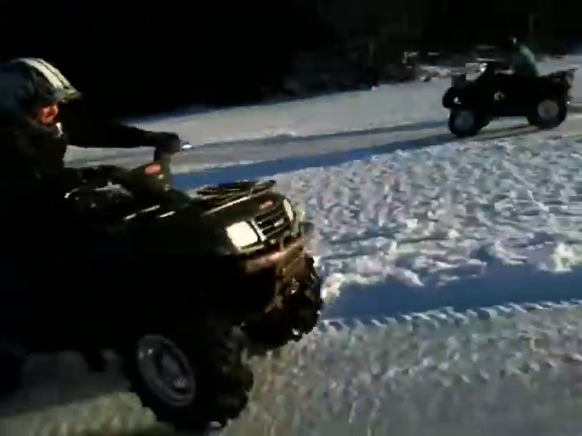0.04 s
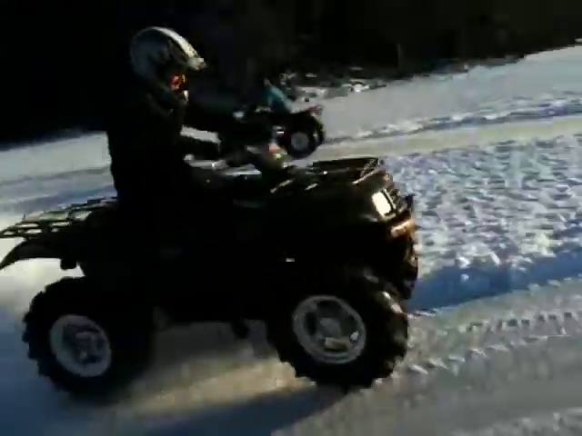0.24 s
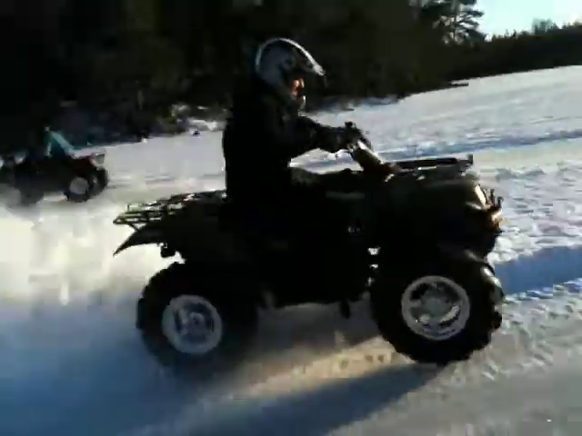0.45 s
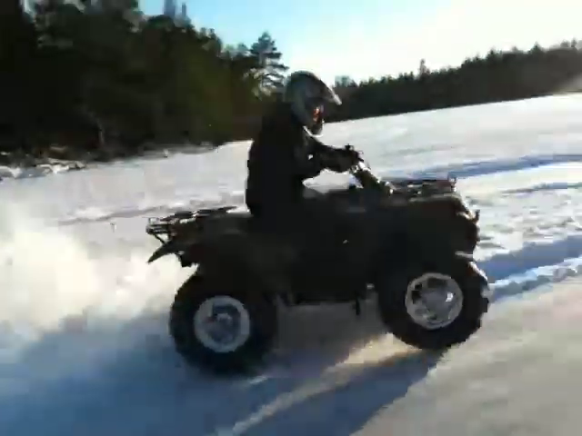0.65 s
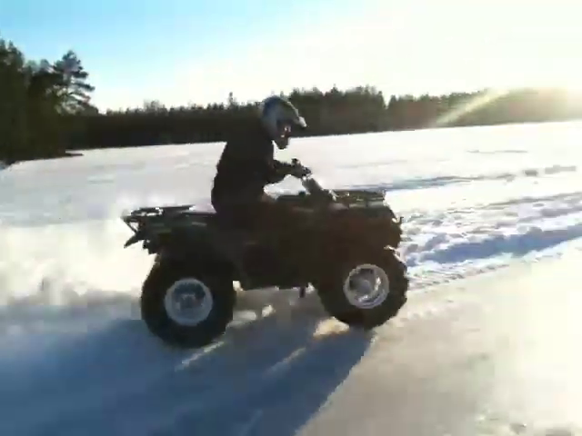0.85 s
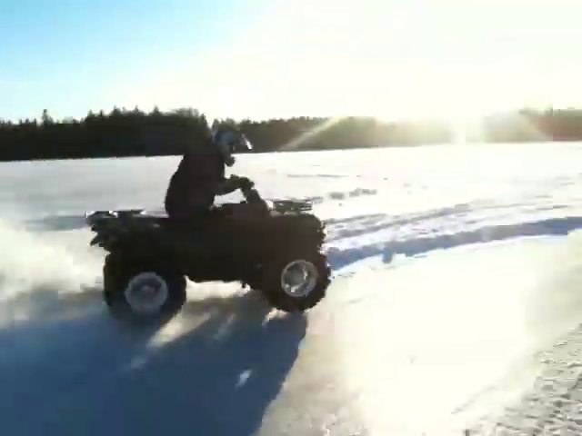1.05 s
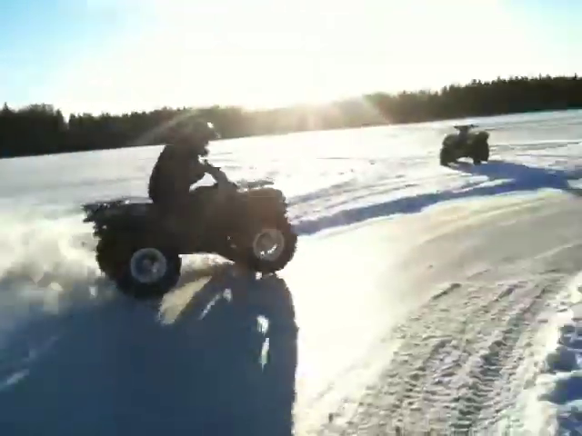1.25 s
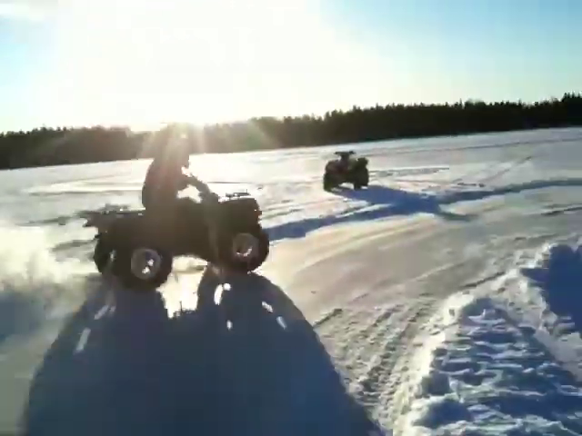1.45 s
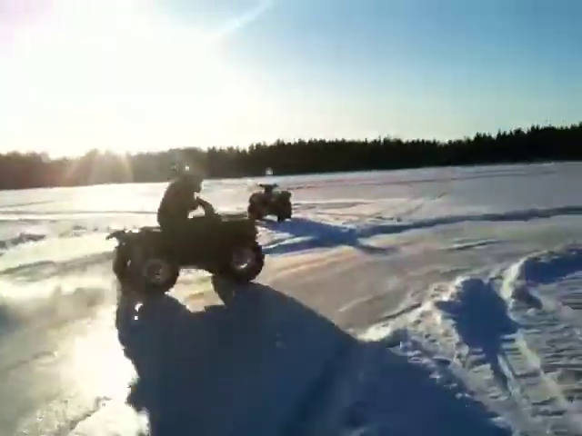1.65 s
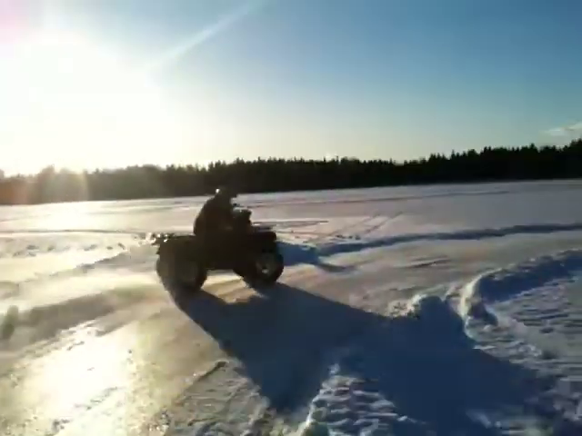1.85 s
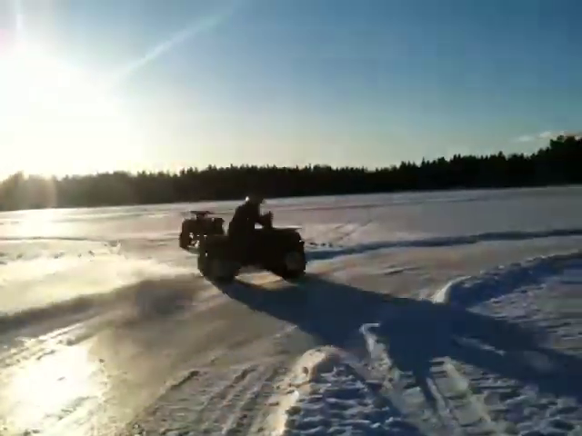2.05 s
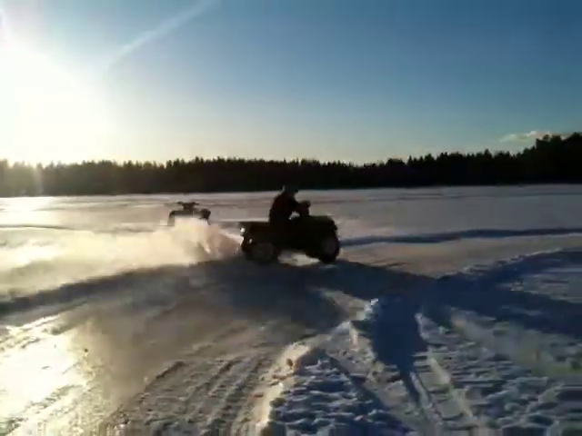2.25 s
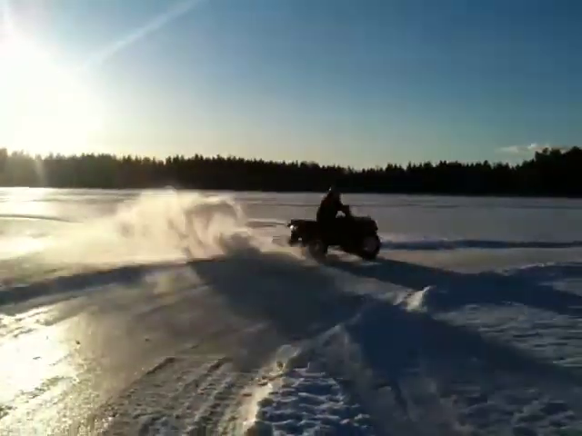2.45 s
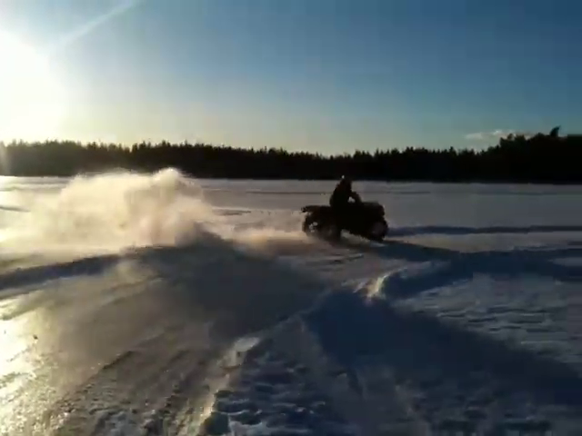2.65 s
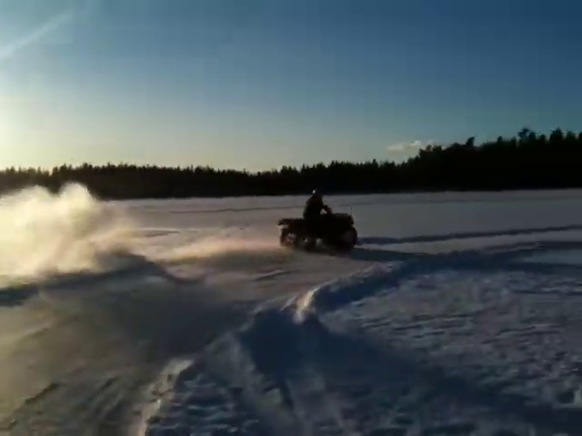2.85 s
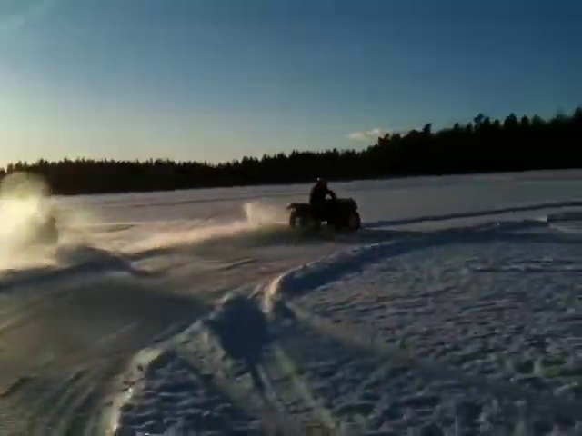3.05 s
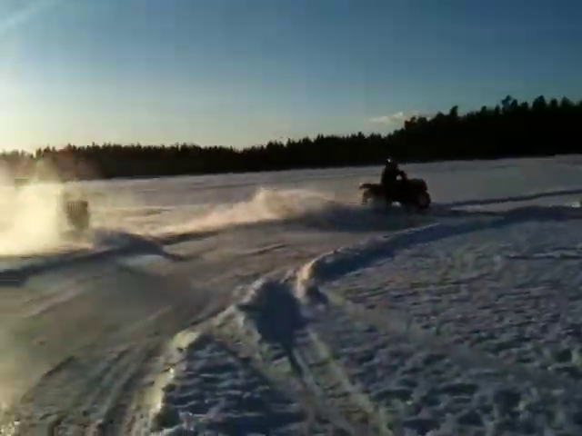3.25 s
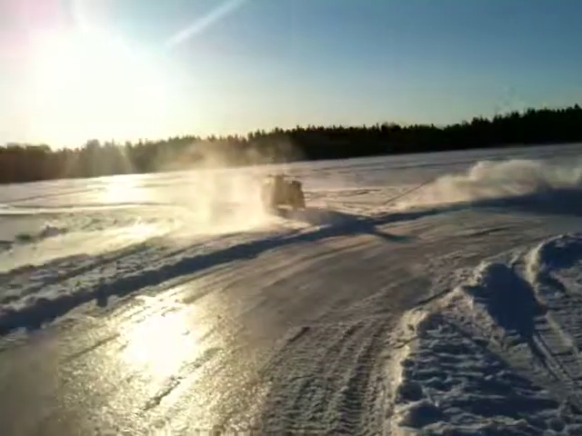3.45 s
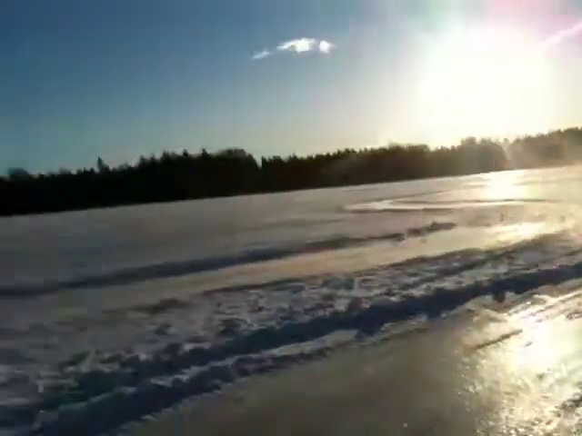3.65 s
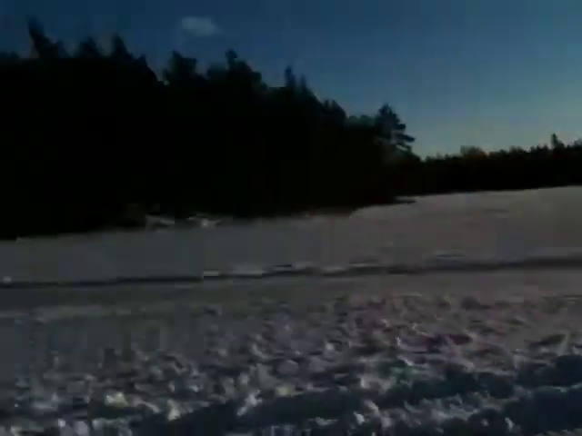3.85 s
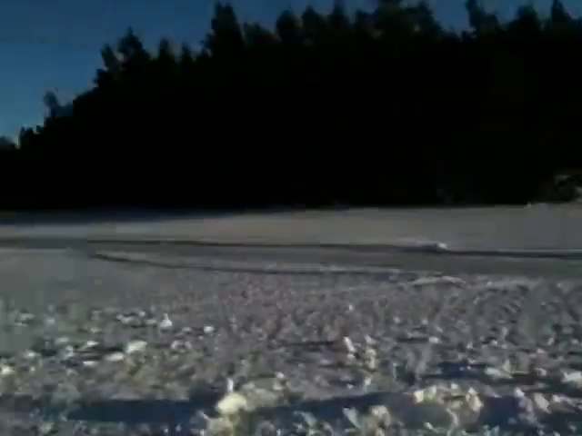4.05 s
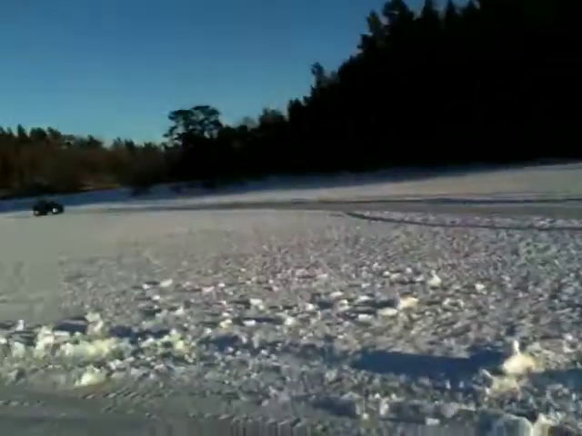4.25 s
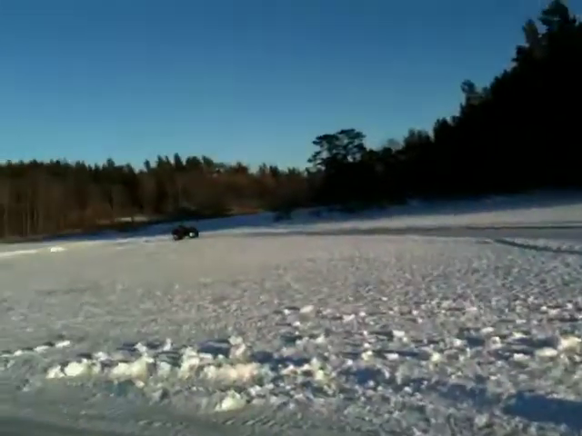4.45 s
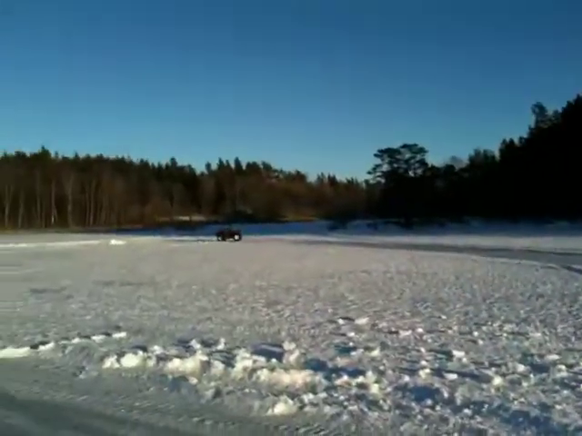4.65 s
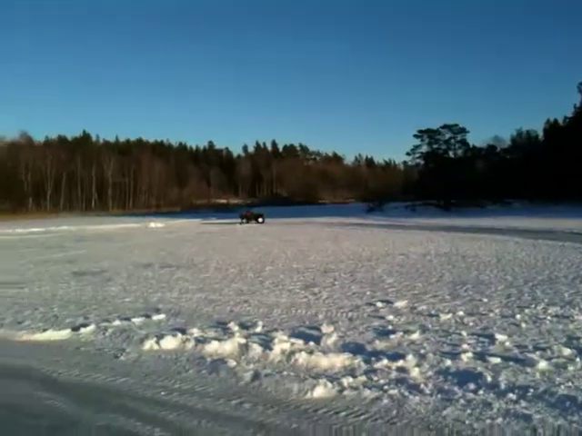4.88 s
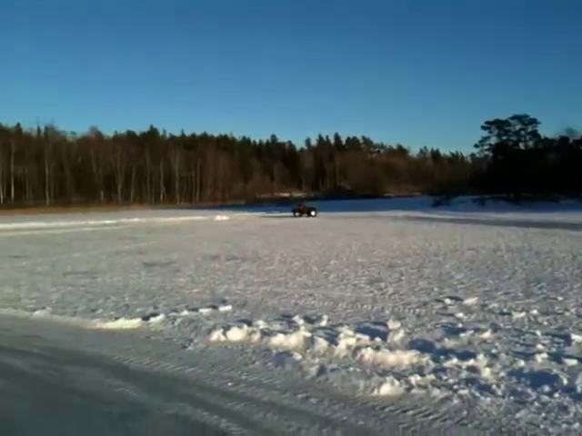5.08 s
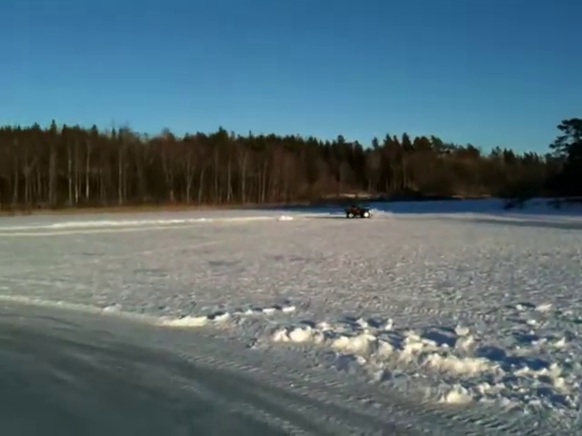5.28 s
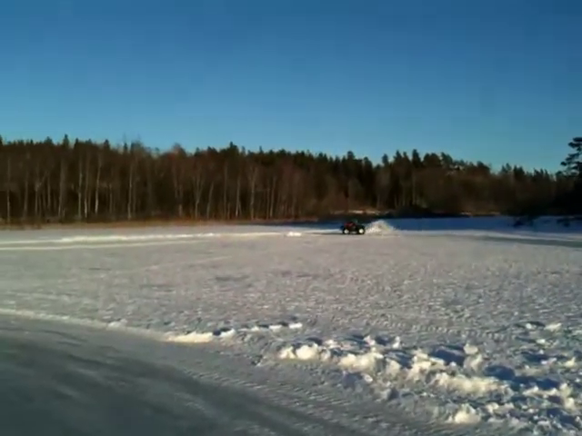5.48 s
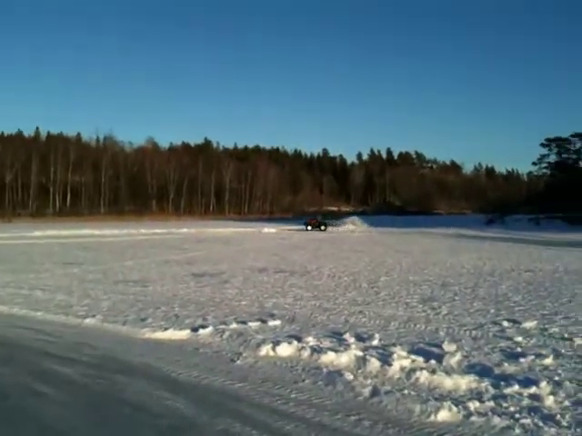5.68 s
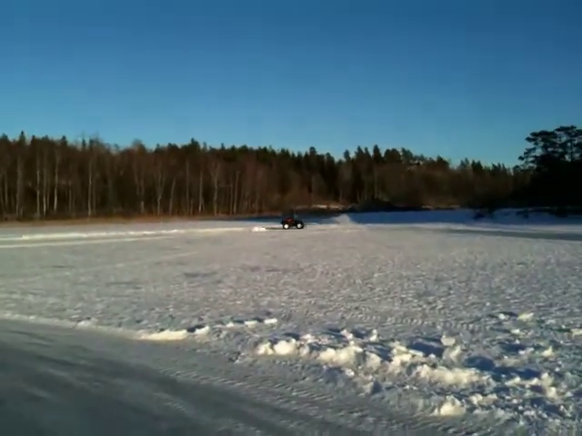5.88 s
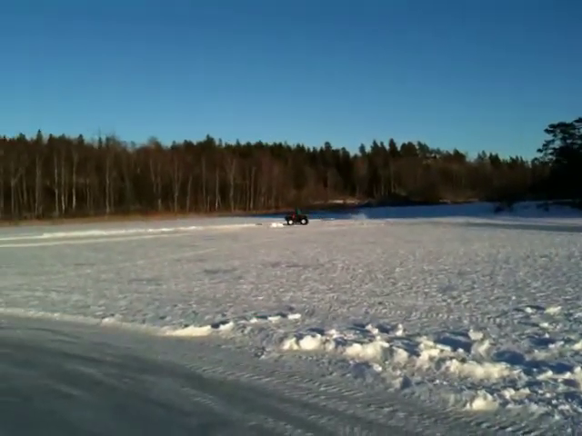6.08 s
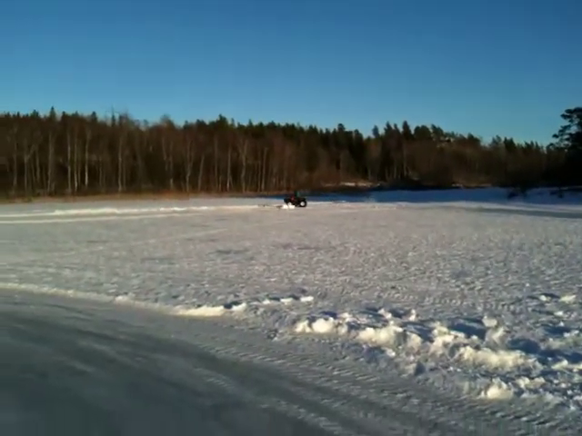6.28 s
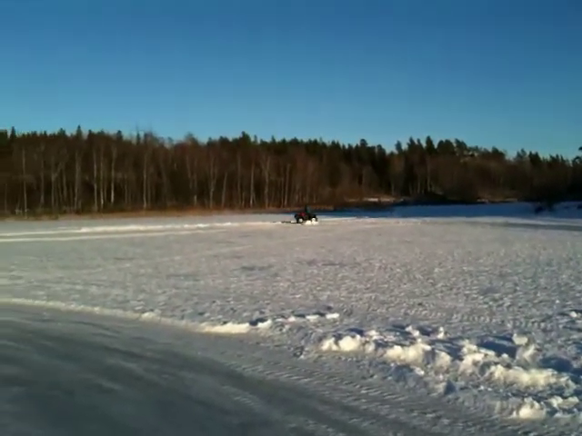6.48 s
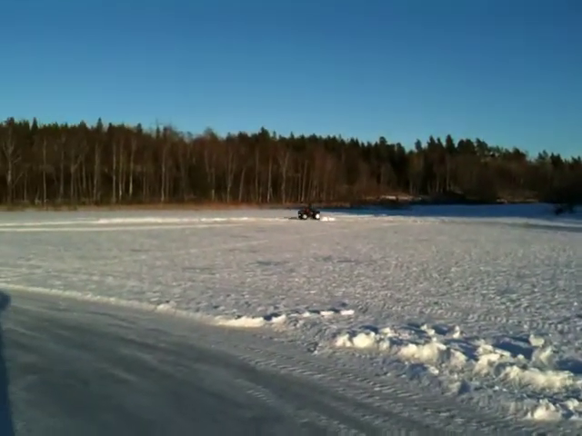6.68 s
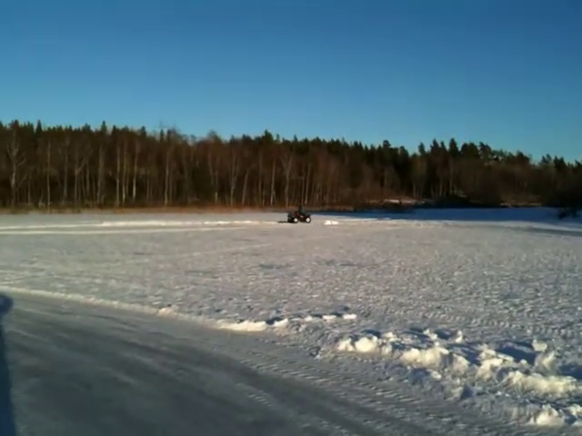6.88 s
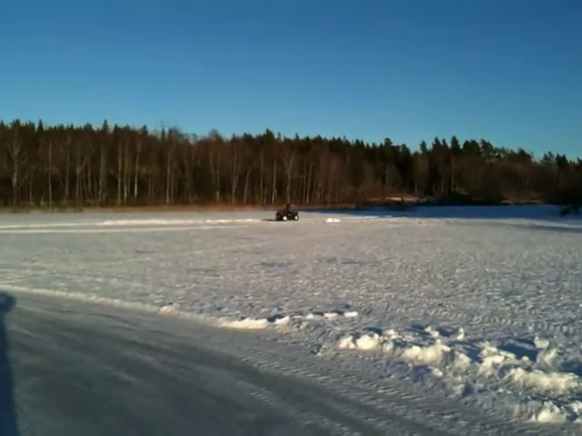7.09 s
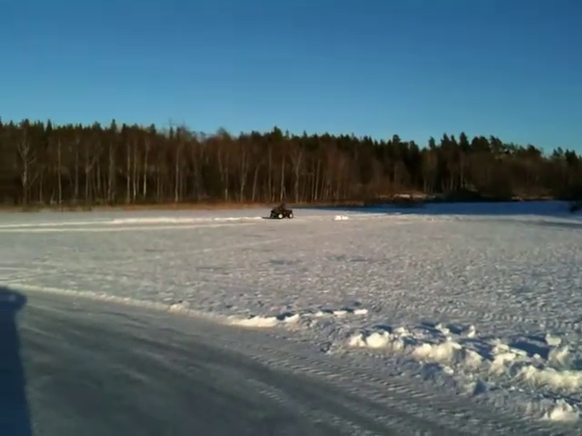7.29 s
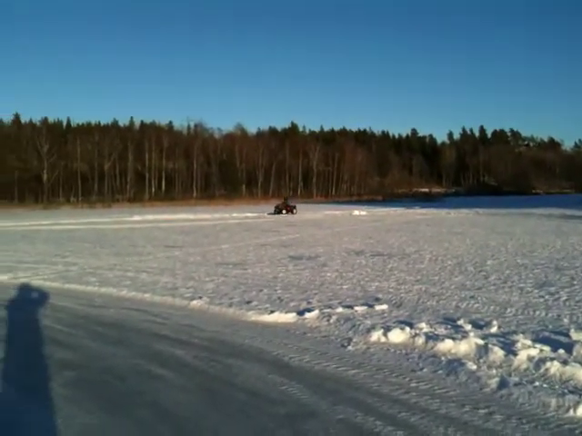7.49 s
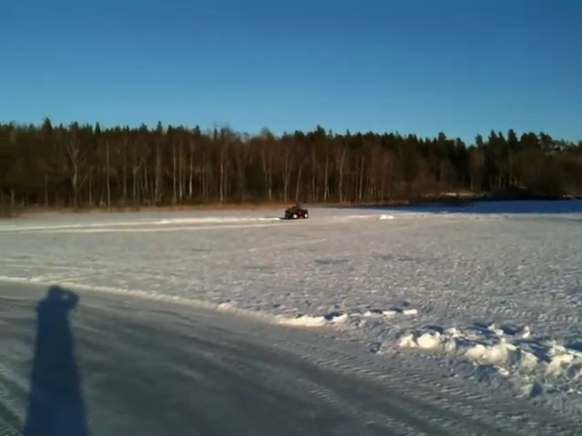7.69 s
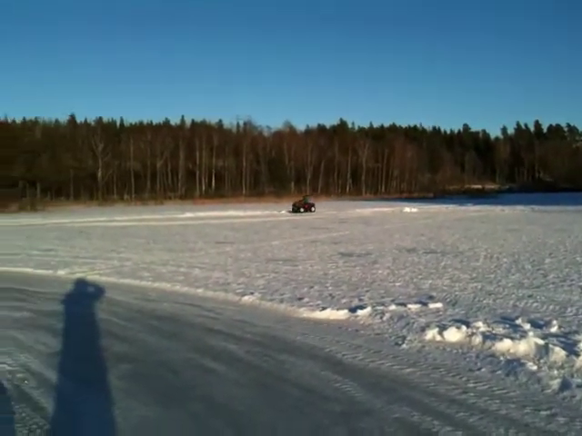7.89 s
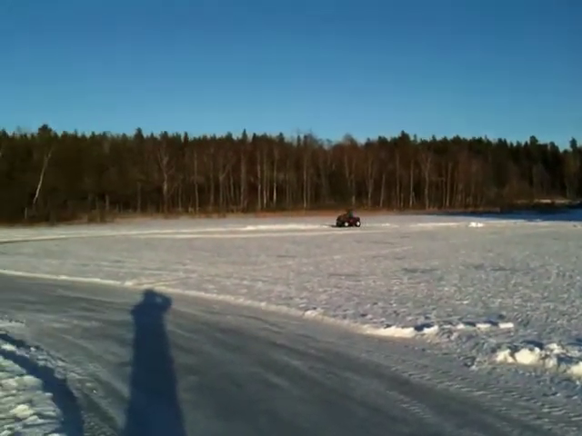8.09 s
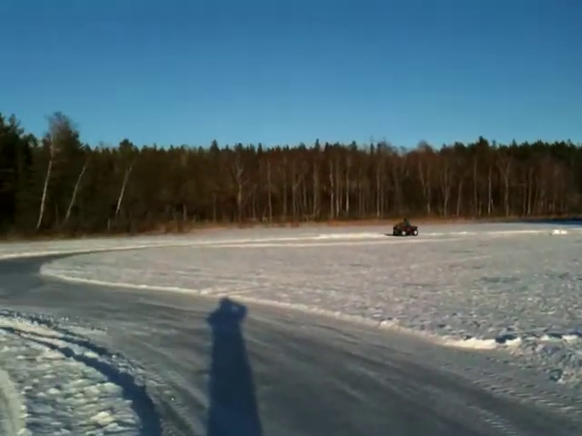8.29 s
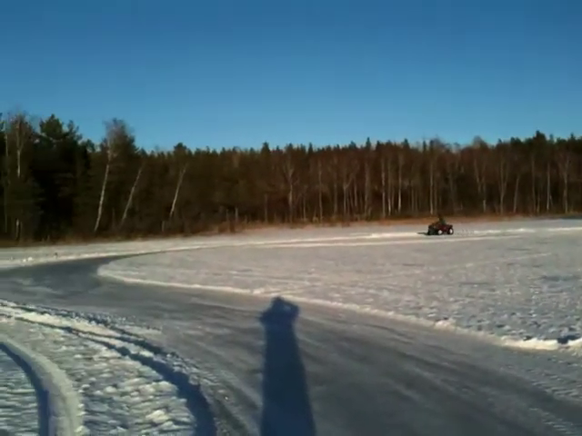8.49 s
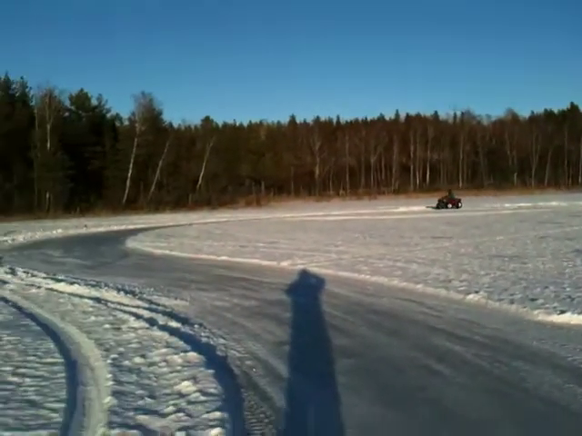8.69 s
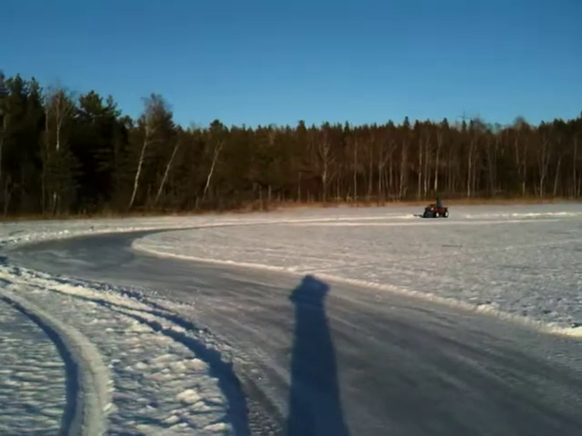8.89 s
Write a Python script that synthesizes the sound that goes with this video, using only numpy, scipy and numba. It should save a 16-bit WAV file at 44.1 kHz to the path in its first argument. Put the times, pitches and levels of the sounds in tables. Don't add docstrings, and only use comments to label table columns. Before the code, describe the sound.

A quad bike skids past close at full throttle, a hoarse, barking, steady engine roar with belt whine, singing metal and gritty tyre hiss. Just before two seconds its pitch sags, then climbs again as it drives off, duller and quieter. Wind thumps the handheld phone, and distant engines hum and chug faintly across the open frozen lake with a little snow crunch.

```python
import sys
import numpy as np
from scipy import signal
from scipy.fft import rfft, irfft
from scipy.io import wavfile
from scipy.ndimage import uniform_filter1d
from numba import njit

SR = 44100
rng = np.random.default_rng(int(sys.argv[2]) if len(sys.argv) > 2 else 0)


def store_wav(level_fs):
    pcm = np.round(np.clip(np.atleast_2d(level_fs), -1, 1) * 32767)
    wavfile.write(sys.argv[1], SR, pcm.T.astype(np.int16))


def boost(x):
    u = np.asarray(x, float) / 20
    return 10 ** u


N = 393813


def unit(x):
    return x / np.sqrt(np.mean(x ** 2))


def curves(table):
    s, *columns = np.transpose(table)
    t = np.arange(N) / SR
    fade_in = np.clip((t - s[0]) / .03 + (s[0] == 0), 0, 1)
    fade_out = np.clip((s[-1] + .02 - t) / .03, 0, 1)
    return [np.interp(t, s, column) for column in columns] + [fade_in * fade_out]


def colour(x, table):
    hz, db = np.transpose(table)
    grid = np.maximum(np.arange(4097) * SR / 8192, 1)
    log_gain = np.interp(np.log(grid), np.log(hz), np.maximum(db, -70)) * np.log(10) / 20
    cepstrum = irfft(log_gain)
    cepstrum[1:4096] *= 2
    cepstrum[4097:] = 0
    response = irfft(np.exp(rfft(cepstrum)))[:4096]
    return unit(signal.oaconvolve(x, response)[:N])


def walk(rate):
    k = int(SR / rate)
    steps = np.repeat(rng.standard_normal(N // k + 1), k)
    return unit(uniform_filter1d(uniform_filter1d(steps, k), k)[:N])


def clicks(at, size):
    at = np.clip(at, 0, N - 2)
    i = at.astype(int)
    return np.bincount(i, size * (1 + i - at), N) + np.bincount(i + 1, size * (at - i), N)


def mix(locked, loose, share):
    share = np.clip(share, 0, 1)
    return np.sqrt(share) * locked + np.sqrt(1 - share) * loose


def swell(start_s, hold_s, attack_s, release_s):
    t = np.arange(N) / SR - start_s
    rise = np.clip(t / attack_s + (start_s <= 0), 0, 1)
    return rise * np.exp(-np.maximum(t - hold_s, 0) / release_s)


def glide_swell(start_s, hold_s):
    return swell(start_s, hold_s, attack_s=0.02, release_s=0.035)


def glide(start_s, hold_s, first_hz, last_hz, db):
    hz = np.interp(np.arange(N) / SR, [start_s, start_s + hold_s], [first_hz, last_hz])
    return hz, boost(db) * glide_swell(start_s, hold_s)


@njit
def ring(x, hz, width_hz):
    y, band, low = np.empty(len(x)), 0., 0.
    for i in range(len(x)):
        g, k = np.tan(np.pi * hz[i] / SR), width_hz / hz[i]
        v = (band + g * (x[i] - low)) / (1 + g * (g + k))
        band, low, y[i] = 2 * v - band, low + 2 * g * v, k * v
    return y


def ring_twice(x, hz, width_hz):
    return unit(ring(ring(x, hz, width_hz), hz, width_hz))


def bands(x, table, width_hz):
    total = np.zeros(N)
    for row in table:
        hz, gain = glide(*row)
        total += gain * ring_twice(x, hz, width_hz)
    return total


def firings(hz, jitter, scatter_db, second_db, puff_s):
    phase = np.cumsum(hz) / SR
    cycles = np.arange(int(phase[-1]))
    chance = rng.standard_normal((600, 4))[:len(cycles)].T
    first = np.interp(cycles + jitter * chance[0], phase, np.arange(N))
    second = np.interp(cycles + .301 + jitter * chance[1], phase, np.arange(N))
    pulses = clicks(first, boost(scatter_db * chance[2]))
    pulses = pulses + clicks(second, boost(second_db + scatter_db * chance[3]))
    keep = np.exp(-1 / (puff_s * SR))
    rounded = signal.lfilter([1], [1, -keep ** 8], pulses)
    return pulses, unit(signal.lfilter([1], [1, -keep], rounded))


# f/Hz, level/dB
AIR_TONE = [(20, -18), (60, 4), (150, 8.5), (330, -25), (500, -11.5), (1500, -14), (2800, -21.5),
            (5700, -25), (15000, -42.5)]


def still_air():
    return boost(-47 + 0.6 * walk(3.87)) * colour(rng.standard_normal(N), AIR_TONE)


# t/s, hold/s, multiple, level/dB
CLEAR_LINES = [(0, .72, 16, -29), (.15, .55, 13, -29), (.2, 1.1, 19, -33), (.66, .6, 17, -33),
               (1.15, .55, 23, -36), (1.3, .42, 26, -36), (1.4, .42, 7, -31), (1.6, .22, 8, -33),
               (1.82, .26, 4, -26), (2.1, .14, 5, -33), (2.1, .2, 6, -33), (2.12, .9, 7, -38),
               (2.15, .45, 10, -39), (2.1, .16, 15, -38), (2.32, .6, 12, -39), (2.3, .9, 13, -41),
               (2.55, 1.2, 20, -43), (3.2, .7, 19, -45), (3.3, .4, 26, -45)]


def clear_lines(exhaust, hz):
    total = np.zeros(N)
    for s, hold, multiple, db in CLEAR_LINES:
        total += boost(db) * glide_swell(s, hold) * ring_twice(exhaust, multiple * hz, 30.)
    return total


# t/s, hold/s, first f/Hz, last f/Hz, level/dB
PIPE_RINGS = [(0, 0.53, 727, 720, -24), (0, 0.22, 290, 230, -23), (0, 0.59, 870, 847, -34),
              (0.38, 0.49, 820, 870, -30), (0.6, 0.61, 990, 975, -28.5), (1.47, 0.31, 1190, 1310, -27.5),
              (0.3, 0.34, 994, 1060, -38), (1.14, 0.44, 400, 400, -29), (0, 0.24, 530, 720, -33),
              (1.3, 0.033, 560, 560, -30), (2.5, 0.99, 410, 430, -36), (4.5, 0.41, 850, 690, -48),
              (1.48, 0.29, 1500, 1600, -31), (0, 0.75, 2700, 2500, -28), (2.5, 1.14, 1800, 2900, -43),
              (3.5, 0.5, 830, 1050, -50), (3.5, 0.32, 1480, 1460, -43.5), (-0.44, 0.27, 970, 980, -20),
              (0.85, .95, 636, 570, -27.5), (1.17, 0.28, 353, 414, -23), (3, 0.27, 1020, 1200, -37)]


def tailpipe(pulses):
    return bands(pulses, PIPE_RINGS, width_hz=135.0) * boost(1.8 * walk(17))


# t/s, hold/s
BROKEN_TOP = [(.05, .2), (.62, .1), (1.35, .45), (2.27, .28), (2.62, .14), (2.97, .06), (3.17, .24),
              (3.48, .04), (3.56, .13), (3.76, .07), (3.98, .09)]


def break_up(hiss, puff, locked):
    sunk = uniform_filter1d(1. * (puff < .5), size=40)
    broken = sum(swell(s, hold, .01, .01) for s, hold in BROKEN_TOP)
    gap = sunk * np.clip(broken * np.clip(2.5 * locked, 0, 1), 0, 1)
    very_top = signal.sosfiltfilt(signal.butter(6, 7900, "high", fs=SR, output="sos"), hiss)
    return hiss + (boost(2.2 * walk(20) - 34 * gap + 2.2) - 1) * very_top


# t/s, cycle rate f/Hz
NEAR_SPEED = [(0, 53.7), (.12, 52.1), (.6, 52.1), (1.35, 51), (1.75, 52.9), (1.8, 52.4), (1.9, 45.5),
              (2.07, 37.3), (2.28, 44.5), (2.4, 48), (2.6, 50.8), (2.8, 51.6), (3.12, 51.7), (3.75, 50.5),
              (4.08, 50.6), (4.5, 51.9), (4.97, 52.3), (5.03, 49.9)]
# t/s, level/dB, treble shading level/dB, share of firing-locked sound/0-1
NEAR_LEVEL = [(0, -15.5, -2, 0), (.14, -17, 1, 0.01), (.5, -16.5, 0, 0.16), (1.32, -18, 0.5, 0.26),
              (1.79, -21, 0, 0.26), (1.84, -23.5, -4.5, 0.24), (2.07, -28, -7, 0.22),
              (2.12, -26.5, -2.5, 0.24), (2.28, -28.5, 4, 0.36), (2.4, -26, 2.5, 0.51),
              (2.6, -24.5, 0.5, 0.44), (2.89, -25, -1.5, 0.45), (3.65, -29.5, 1, 0.42),
              (4.04, -29, -6.5, 0.34), (4.2, -31.5, -20.5, 0.46), (4.5, -30, -23, 0.25),
              (4.97, -31.5, -23.5, 0.47), (5.03, -39, -30.5, .5)]
# t/s, first pitch it cancels f/Hz, farness/0-1
ICE_MIRROR = [
    (0, 4500, 0.25),
    (1.8, 3800, 0.14),
    (2.4, 3670, 0.27),
    (3.6, 3350, 0.16),
    (3.95, 3340, 0.45),
    (4.25, 2554, 0.82),
    (4.6, 3572, 0.94),
    (4.85, 3030, 0.9),
    (5.05, 2430, .98),
]
# f/Hz, level/dB
BOOM_TONE = [(40, -47.5), (70, -46), (105, -4), (150, 4.5), (210, -0.5), (260, 1.5), (310, -4.5),
             (370, -8.5), (430, -14), (560, -35.5), (800, -62.5), (2000, -72)]
# f/Hz, level/dB
BARK_TONE = [(250, -39), (430, 0), (560, 2.5), (700, 0), (850, 2), (1050, -1), (1300, -2.5), (1600, -12.5),
             (2200, -26.5), (4500, -52.5)]
# f/Hz, level/dB
ROAR_TONE = [(900, -20.5), (1400, 0.5), (1800, 0.5), (2100, 1.5), (2700, -2.5), (3100, -5), (3800, -8.5),
             (5000, -38), (7000, -71)]
# f/Hz, level per Hz/dB
HISS_TONE = [(1650, -42), (2800, 2.0), (3140, -8.5), (4050, -2.0), (4710, -4.0), (5800, -6), (6950, -10.0),
             (9270, -16.5), (14200, -19.0), (15900, -28.5), (17000, -22)]
BARK_DB, BARK_SHADE = -2.76, 0.34
ROAR_DB, ROAR_SHADE = -6.5, 0.41
HISS_DB, HISS_SHADE = -5.5, 0.79
NEAR_SECOND_DB = -1.5


def near_quad():
    hz, _ = curves(NEAR_SPEED)
    boom_db, shade_db, locked, on = curves(NEAR_LEVEL)
    bark_db = boom_db + BARK_DB + BARK_SHADE * shade_db
    roar_db = boom_db + ROAR_DB + ROAR_SHADE * shade_db
    hiss_db = boom_db + HISS_DB + HISS_SHADE * shade_db
    pulses, puff = firings(hz, jitter=.002, scatter_db=.8, second_db=NEAR_SECOND_DB, puff_s=.0038)
    puff = unit(uniform_filter1d(puff, size=90))
    noise = rng.standard_normal((5, N))

    bark = colour(mix(unit(pulses), unit(noise[0] * (puff + 1.2)), locked + .36), BARK_TONE)
    gated_roar = unit(noise[1] * puff + 1.15 * unit(pulses))
    roar = colour(mix(gated_roar, noise[2], 1.45 * locked), ROAR_TONE)
    hiss = colour(mix(noise[3] * puff, noise[4], 1.55 * locked), HISS_TONE) * boost(.7 * walk(14))
    hiss = break_up(hiss, puff, locked)

    notch_hz, farness, _ = curves(ICE_MIRROR)
    far_share = np.clip(farness, 0, 1)
    dull_hiss = colour(hiss, [(3000, 7.5), (5800, -8.5), (7000, -19.0), (12000, -19)])
    hiss += far_share * (dull_hiss - hiss)

    _, quick = firings(hz, jitter=.002, scatter_db=1.2, second_db=NEAR_SECOND_DB, puff_s=0.0029)
    crack_tone = [(1200, -34), (1900, 1), (2400, 5.5), (2900, -1.5), (3400, -11), (6000, -16), (8000, -23.5)]
    crack = colour(quick * rng.standard_normal(N), crack_tone)
    roar = roar + 2 * locked * crack

    top = boost(roar_db) * roar + boost(hiss_db) * hiss
    depth = 0.033 + (1 - 0.033) * farness
    mirrored = np.interp(np.arange(N) - SR / (2 * notch_hz), np.arange(N), top)
    top = (top + depth * mirrored) / np.sqrt(1 + depth ** 2)

    boom = colour(pulses, BOOM_TONE)
    boom = boom - 1.12 * far_share * ring(boom, np.full(N, 365.), 47.0)

    lines = clear_lines(bark - 2 * boom, hz)
    pipe = tailpipe(mix(unit(pulses), unit(noise[4] * (puff + 0.71)), locked + 0.19))
    return on * (boost(bark_db - 1.5) * bark + top + lines + pipe - boost(boom_db + 3.0) * boom)


# t/s, hold/s, first f/Hz, last f/Hz, level/dB
BELT = [
    (0, 0.36, 1301, 1352, -33),
    (0.327, 0.41, 1334, 1394, -34),
    (0.763, 0.108, 1375, 1415, -31),
    (.87, 0.46, 1410, 1412, -32),
]
# t/s, hold/s, first f/Hz, last f/Hz, level/dB
COASTING_GEARS = [
    (1.84, .27, 1610, 1195, -45),
    (2.14, .14, 1175, 1150, -45),
]
# t/s, hold/s, first f/Hz, last f/Hz,
# level/dB
FAINT_DRONE = [
    (13, 0.46, 2600, 2800, -67),
    (16, 0.245, 822, 880, -60),
    (8.0, .45, 133, 150, -46),
    (6.2, .16, 122, 131, -41),
]


def belt_and_gears():
    total = np.zeros(N)
    for row in [*BELT, *COASTING_GEARS, *FAINT_DRONE]:
        hz, gain = glide(*row)
        gain = gain * boost(6.5 + 1.5 * walk(39.0))
        wavering_hz = hz * (1 + 0.00434 * walk(29.65))
        total += gain * np.sin(2 * np.pi * np.cumsum(wavering_hz) / SR)
    return total


# t/s, hold/s, first f/Hz, last
# f/Hz, level/dB
SINGING_METAL = [(0, .48, 6450, 6800, -34), (.53, .26, 6950, 7020, -32), (.82, .68, 7020, 7150, -36),
                 (.12, .66, 3980, 4050, -33), (.86, .56, 5750, 5650, -34), (1.42, .36, 5800, 6400, -34),
                 (1.26, .2, 3750, 4050, -33), (2.1, .15, 5980, 5780, -36), (2.32, .3, 5900, 6700, -42),
                 (2.78, .2, 5680, 5920, -40), (2.6, .6, 7300, 7420, -41), (3.46, .26, 7350, 7020, -43),
                 (2.33, .7, 4600, 4900, -40), (3.08, .55, 4200, 4350, -43)]


def singing_metal():
    total = np.zeros(N)
    for row in SINGING_METAL:
        hz, gain = glide(*row)
        flutter = boost(-1.5 + 1.8 * walk(22)) * walk(380)
        total += gain * flutter * np.sin(2 * np.pi * np.cumsum(hz) / SR)
    return total


# t/s, hold/s, level/dB
WIND_GUSTS = [(0, 0.15, -19.5), (0.286, 0.76, -20), (1.068, 0.24, -19.5), (1.459, 0.45, -30),
              (2.064, 0.22, -29), (3.838, 0.12, -30), (4.2, 0.18, -29), (4.451, 0.4, -49),
              (5.878, 0.047, -45.5), (6.152, 0.096, -42), (6.576, 0.026, -37), (6.727, 0.15, -37.5),
              (6.953, 0.12, -29.5), (7.159, 0.099, -31), (7.64, 0.37, -36), (8.115, 0.27, -44.5),
              (8.375, 0.26, -36.5), (8.603, 0.22, -35.5), (8.83, 0.22, -40)]
# t/s, peak level/dB, pitch f/Hz, snap level over it/dB
WIND_BUFFETS = [(3.882, -10.5, 160.3, -15), (4.02, -11, 154, -14), (4.214, -8.5, 200, -24),
                (4.336, -8.5, 297, -14), (4.38, -11, 160, -10), (4.509, -13, 258, -16),
                (5.912, -13, 181, -29), (6.181, -18, 223, -33), (6.241, -12, 190, -15),
                (6.617, -13.5, 199, -12), (6.776, -13, 190, -18), (6.879, -24, 207, -34),
                (7.029, -14, 371, -3), (7.089, -13, 232, -30), (7.238, -8.5, 189, -18),
                (7.302, -22, 211, -2), (7.67, -19, 212, -14), (7.748, -19, 227, -9), (7.806, -21, 161, -6),
                (7.835, -15, 229, -17), (7.875, -25, 156, 1), (7.933, -24, 160, 0), (7.958, -15, 232, -12),
                (8.032, -15.5, 239, -8), (8.148, -19.5, 240, -22), (8.391, -15.5, 287, -9),
                (8.481, -22, 297, -3), (8.508, -10.5, 247, -18), (8.704, -12.5, 257, -4.5),
                (8.722, -10, 215, -13), (8.61, -17, 230, -18), (7.204, -17, 200, -22),
                (7.394, -15, 200, -29), (5.973, -21.5, 228, -40), (4.74, -16.5, 200, -26),
                (4.809, -18, 172, -22), (6.819, -19, 169, -16), (6.95, -24, 207, -9), (7.003, -23, 170, -8),
                (7.159, -24, 300, -11), (7.181, -25, 196, -11), (7.708, -27, 250, -10),
                (7.985, -27, 170, -9), (8.078, -24, 205, -11), (8.329, -23, 170, -9),
                (8.452, -27, 221, -10), (8.651, -26, 207, -8), (8.788, -20, 170, -12),
                (8.825, -24, 221, -6), (8.854, -25, 237, -10)]
# f/Hz, level per Hz/dB
WIND_TONE = [(30, -41), (65, -27.5), (130, -2), (240, 0), (380, -5), (550, -17), (800, -25), (1200, -59.5)]


def wind():
    force = boost(-53.5)
    for s, hold, db in WIND_GUSTS:
        force = force + boost(db) * swell(s, hold, attack_s=0.049, release_s=0.059 + 0.35 * hold)
    chance = rng.random((5000, 3)).T
    pop_size = boost(np.minimum(-2.2 * np.log(chance[2]), 6.5))
    pops = clicks(chance[0] * N, np.sign(chance[1] - .5) * pop_size)
    out = colour(pops * boost(5 * np.tanh(.7 * walk(30))), WIND_TONE) * force
    t = np.arange(1300) / SR
    for s, peak_db, hz, snap_db in WIND_BUFFETS:
        i = int(s * SR)
        swing = 2 * np.pi * np.clip(hz, 140, 330) * t
        thump = np.sin(swing) * (t / 0.0039) * np.exp(1 - t / 0.0029)
        snap = np.sin(2 * np.pi * 520 * t) * (t / 0.0042) ** 2 * np.exp(2 - t / 0.0011)
        out[i:i + len(t)] -= boost(peak_db - 3.0) * (thump + boost(snap_db + 10.0) * snap)[:N - i]
    return out


# t/s, hold/s, first f/Hz, last f/Hz, level/dB
ICE_SPRAY = [
    (3.95, .3, 4150, 4500, -58.5),
    (4.26, 0.095, 3800, 3600, -55),
    (4.755, .17, 5450, 5106, -57),
    (4.898, 0.059, 4660, 4300, -57),
    (4.938, 0.054, 1210, 1110, -42),
    (5.01, .07, 3200, 2700, -58),
]


def spray():
    return bands(rng.standard_normal(N), ICE_SPRAY, width_hz=900.)


# t/s, cycle rate f/Hz
OTHER_SPEED = [(5.0, 28), (6.46, 28.8), (6.56, 29.8), (6.92, 37), (7.1, 38.5), (7.5, 35.6), (7.9, 44),
               (8.4, 47), (8.93, 47)]
# t/s, hold/s, level/dB, top level over it/dB
OTHER_BURSTS = [(4.096, 0.81, -69, 7), (4.946, 0.044, -54, -15), (5.093, 0.099, -54.5, -8),
                (5.396, .1, -55.5, -17), (5.616, 0.2, -52, -5.5), (5.905, 0.36, -71, 0),
                (6.21, 0.13, -53, -1.5), (6.42, 0.18, -54, -10), (6.58, 0.52, -50.5, -13),
                (7.092, 0.48, -52.5, -25), (7.636, 0.41, -51.5, -16), (8.038, 0.42, -48, -9.5),
                (8.45, 0.42, -51.5, -20), (8.82, .2, -54, -15)]
# f/Hz, level per Hz/dB
CHUG_TONE = [(700, -13), (1300, -3), (1750, -1), (2000, 0), (2350, -1), (3100, -1.5), (4200, -6),
             (4900, -7.5), (5800, -7), (7500, -15.5), (9500, -45)]
# f/Hz, width/Hz, level/dB
CASING_RINGS = [(4210, 300, -10), (2350, 230, -11)]


def other_quad():
    hz, _ = curves(OTHER_SPEED)
    depth = 0.22 + 0.93 * swell(6.4, 0.18, attack_s=0.081, release_s=0.26)
    level, bright = np.zeros(N), np.zeros(N)
    for s, hold, db, top_db in OTHER_BURSTS:
        burst = boost(db) * swell(s, hold, attack_s=0.06, release_s=0.047)
        level += burst
        bright += burst * boost(top_db)
    turns = np.cumsum(hz) / SR
    since_firing = (turns - turns[int(6.524 * SR)]) % 1
    beat = unit(uniform_filter1d(np.exp(-since_firing / 0.22), size=110))
    noise = rng.standard_normal((2, N))
    rattle = mix(noise[0] * beat, noise[1], depth)
    chug = colour(rattle, CHUG_TONE)
    casing = np.zeros(N)
    for f, width, db in CASING_RINGS:
        casing += boost(db) * unit(ring(chug, f * (1 + 0.026 * walk(4.3)), 1. * width))
    top = colour(rattle, [(4500, -37), (6500, -6.0), (8500, -4.0), (11000, -11.5), (16500, -28)])
    bright = bright * boost(1.5 * walk(11))
    return boost(-4.0) * (level * (chug + casing) + bright * top)


# t/s, cycle rate f/Hz
FAR_SPEED = [(5.0, 51), (5.1, 44.4), (5.2, 39.4), (5.35, 34.8), (5.59, 31), (5.69, 34.8), (5.78, 37.8),
             (5.99, 31.7), (6.07, 29.1), (6.2, 26.7), (6.3, 25.5), (6.52, 24.3)]
# t/s, level/dB
FAR_EFFORT = [
    (5.0, -32),
    (5.3, -35.5),
    (5.55, -39),
    (5.7, -32.5),
    (5.85, -37.5),
    (6.1, -39.5),
    (6.3, -47),
    (6.52, -52),
]
# f/Hz, level/dB
FAR_TONE = [(40, -56), (70, -41), (100, -1.5), (135, 1.5), (175, 6.5), (215, 1.5), (270, -9), (320, -11),
            (370, -54), (500, -59)]
# t/s, cycle rate f/Hz
SHORE_SPEED = [(6.25, 30.5), (6.55, 30), (6.74, 31.3), (6.86, 34.2), (7.0, 35), (7.25, 34.3), (7.55, 37.2),
               (7.85, 37.3), (8.3, 39), (8.6, 40.4), (8.93, 40.6)]
# t/s, level/dB
SHORE_EFFORT = [
    (6.249, -47),
    (6.5, -40.5),
    (6.8, -39),
    (7.3, -36),
    (7.55, -37.5),
    (7.8, -39.5),
    (8.299, -38.5),
    (8.93, -39),
]
# f/Hz, level/dB
SHORE_TONE = [(40, -53), (70, -37), (110, -13), (150, 2.5), (190, 2.5), (250, -1), (300, -8.5), (370, -29),
              (500, -62.5)]


def far_quad(speed, effort, tone, waver):
    steady, on = curves(speed)
    hz = steady * (1 + .008 * waver * walk(6))
    boom_db, _ = curves(effort)
    shut = uniform_filter1d(1. * (np.gradient(steady) < 0), size=3000)
    pulses, _ = firings(hz, jitter=.009 * waver, scatter_db=1.6, second_db=-11, puff_s=.004)
    fourth = shut * boost(boom_db - 4) * ring_twice(pulses, 4 * hz, 16.0)
    sixth_db = boom_db - 1 - 10 * shut + 7 * waver * np.tanh(walk(45))
    sixth = boost(sixth_db) * np.sin(6 * 2 * np.pi * np.cumsum(hz) / SR)
    boom = boost(boom_db + 2.2 * waver * walk(22)) * colour(pulses, tone)
    return on * (boom + sixth + fourth)


# t/s, hold/s, level/dB
BOOT_CRUNCH = [
    (6.243, 0.103, -48),
    (6.344, 0.072, -42),
    (8.009, 0.032, -43.5),
    (8.046, 0.12, -56),
    (8.867, 0.056, -49),
]
# f/Hz, level per Hz/dB
SNOW_TONE = [(290, -37), (500, -5), (551, -9), (614, -6.5), (1480, -6.5), (2320, -20), (2690, -15),
             (9000, -35), (11700, -61), (19800, -120)]


def boot():
    weight = np.zeros(N)
    for s, hold, db in BOOT_CRUNCH:
        weight += boost(db) * swell(s, hold, attack_s=.012, release_s=0.0062)
    chance = rng.random((40000, 3)).T
    crystals = clicks(chance[0] * N, np.sign(chance[1] - .5) * boost(-3.5 * np.log(chance[2])))
    snow = colour(crystals, SNOW_TONE)
    return weight * (snow + 0.91 * ring(snow, np.full(N, 1120.), 140.0))


def scene():
    total = still_air() + near_quad() + belt_and_gears() + singing_metal() + wind()
    total = total + spray() + other_quad()
    total = total + far_quad(FAR_SPEED, FAR_EFFORT, FAR_TONE, waver=0.37)
    total = total + far_quad(SHORE_SPEED, SHORE_EFFORT, SHORE_TONE, waver=1)
    return (total + boot())[None]


def holes(x):
    hz, _, z = signal.stft(x, SR, nperseg=1024)
    patches = rng.random((z.shape[-2] // 8 + 1, z.shape[-1] // 3 + 1))
    patches = np.repeat(np.repeat(patches, 8, axis=0), 3, axis=1)[:z.shape[-2], :z.shape[-1]]
    lost = (patches < .1) & (hz[:, None] > 8000)
    return signal.istft(z * ~lost, SR, nperseg=1024)[1][..., :N]


def band_limit(x):
    return signal.sosfilt(signal.butter(12, 15950, fs=SR, output="sos"), x)


def record(dry):
    heard = signal.sosfilt(signal.butter(3, 89, "high", fs=SR, output="sos"), dry)
    rounded = np.tanh(1.136 * heard) / 1.098
    finished = holes(rounded)
    return band_limit(finished)


dry = scene()
out = record(dry)
store_wav(out)
```